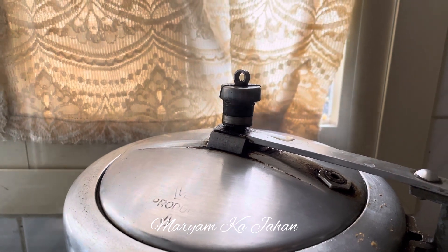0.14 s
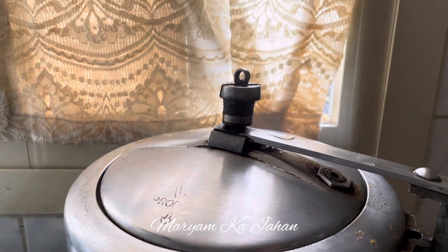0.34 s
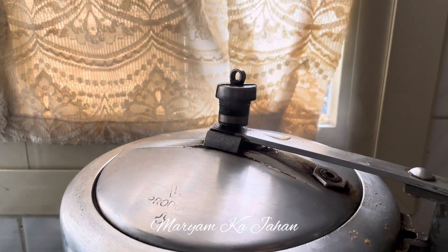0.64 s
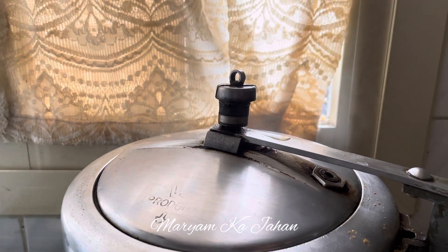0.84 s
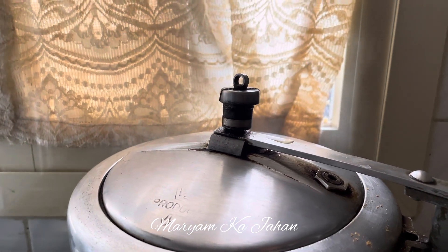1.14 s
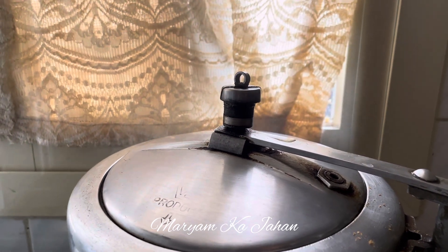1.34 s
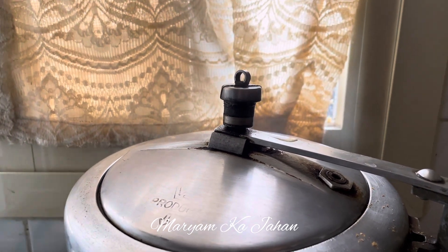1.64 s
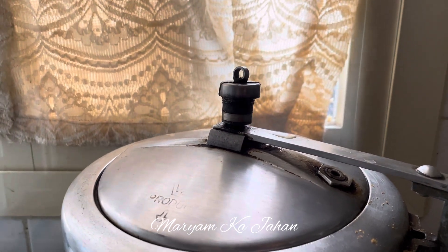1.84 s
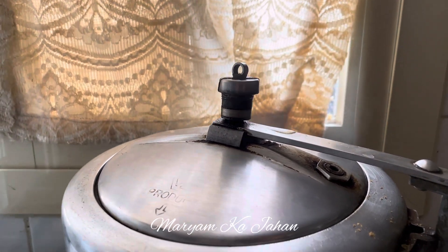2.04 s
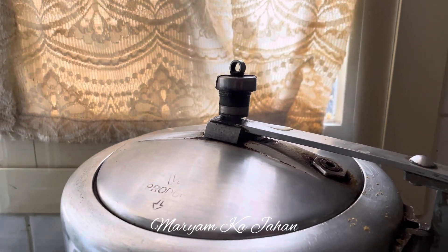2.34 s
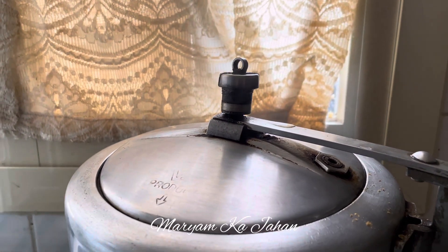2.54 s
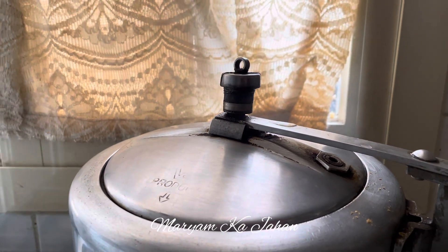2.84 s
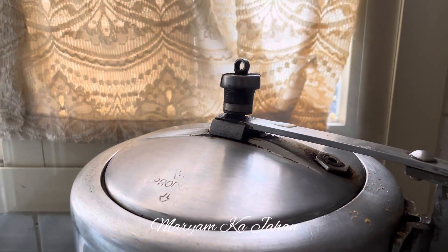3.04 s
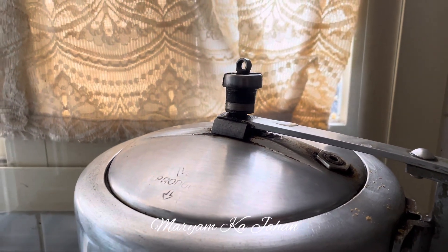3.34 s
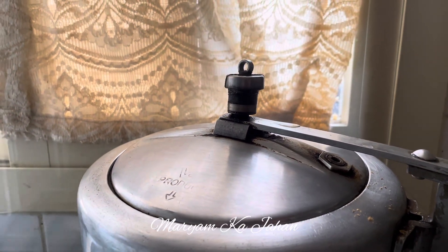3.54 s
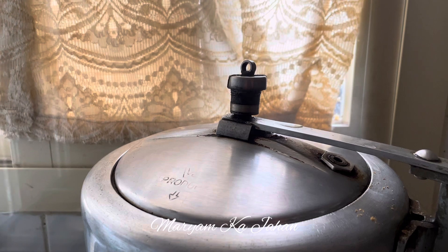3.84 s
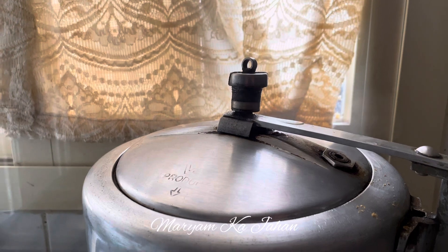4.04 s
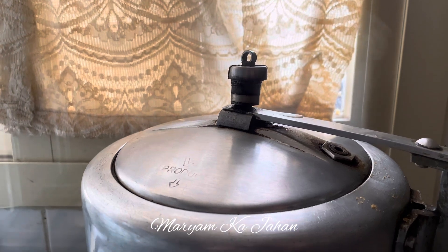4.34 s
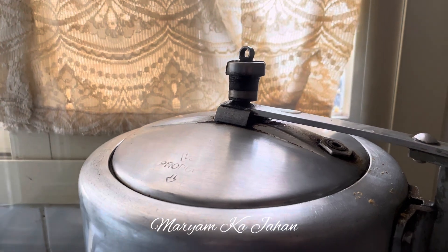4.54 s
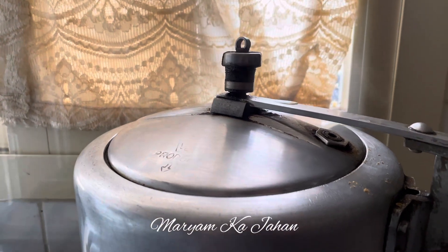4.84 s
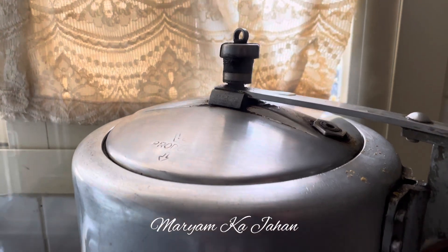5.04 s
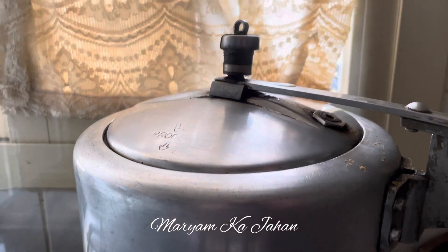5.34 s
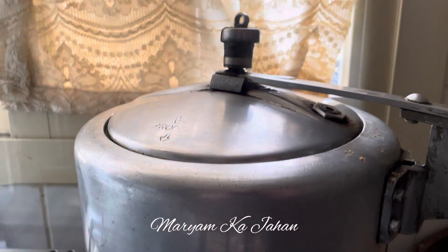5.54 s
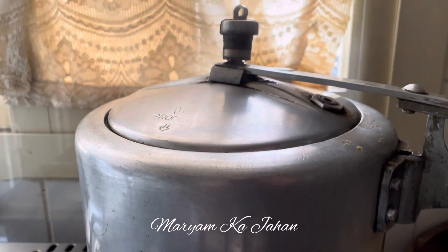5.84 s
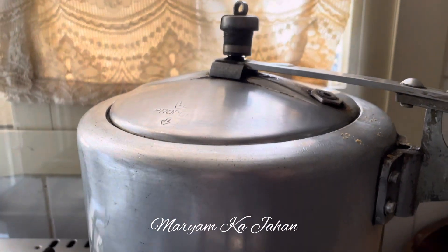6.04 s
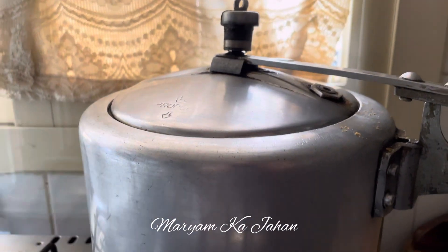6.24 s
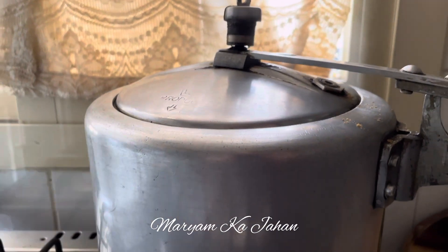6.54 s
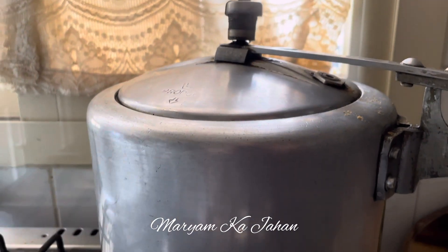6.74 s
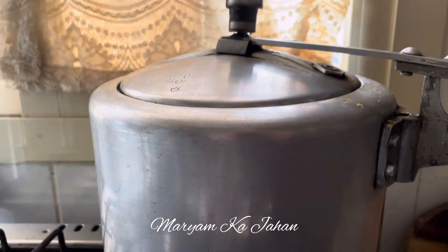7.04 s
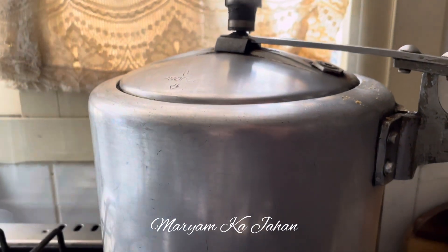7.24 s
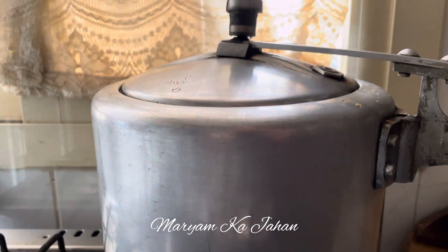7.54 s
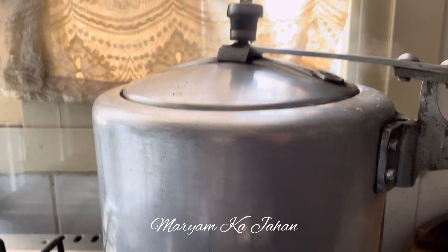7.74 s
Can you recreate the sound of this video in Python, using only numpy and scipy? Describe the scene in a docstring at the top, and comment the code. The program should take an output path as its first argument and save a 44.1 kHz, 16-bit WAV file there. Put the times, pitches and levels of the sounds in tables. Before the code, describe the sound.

A pressure cooker vents steam continuously, a sharp airy hiss fluttering slightly, with low flame roar and mains hum underneath.

```python
"""Steam hisses from under the weighted valve of a pressure cooker, over burner rumble and a faint hum.
Steam is noise coloured by jet, valve and echoes; the burner is low noise through pot and room resonances.
Hum is wavering sines, the faint whistle one unsteady sine, the soft bumps damped modes.
A hand-held pair of ports sinks from above the lid to beside the pot and tilts, shifting colour and echoes."""
import sys
import numpy as np
from scipy import signal
from scipy.fft import rfft, irfft
from scipy.io import wavfile

SR = 44100
rng = np.random.default_rng(int(sys.argv[2]) if len(sys.argv) > 2 else 0)


def generate_wav(signal):
    """Clip the signal to [-1, 1] and save it as 16-bit WAV at the path in sys.argv[1]."""
    frames = np.transpose(np.atleast_2d(signal))
    scaled = np.clip(frames, -1, 1) * 32767
    pcm = np.round(scaled).astype(np.int16)
    wavfile.write(sys.argv[1], SR, pcm)


N = 347949
TIME = np.arange(N) / SR
CUTOFF_HZ = 15720
FRAME = 1024  # samples per STFT frame
CROSSOVER_HZ = 1305  # burner below, jet above


def from_db(db):
    """Decibels to amplitude gain."""
    return 10 ** (np.asarray(db) / 20)


def read(rows, at):
    """Each column of a table, joined by straight lines."""
    first, *columns = np.transpose(rows)
    return [np.interp(at, first, column) for column in columns]


def read_hz(rows, hz):
    """Each column of a spectrum, joined on a log-frequency axis."""
    first, *columns = np.transpose(rows)
    return [np.interp(np.log(hz + 1), np.log(first), column) for column in columns]


def bell(at, centre, width):
    """Gaussian hump of height 1, in frequency or time; width is its sigma."""
    return np.exp(-.5 * ((at - centre) / width) ** 2)


def drift(per_s, at):
    """Normal random values, per_s of them each second, joined by straight lines."""
    steps = rng.standard_normal(4096)
    return np.interp(at * per_s, np.arange(len(steps)), steps)


def ease(t, middle_s, lasts_s):
    """Half-sine move from 0 to 1."""
    return (1 + np.sin(np.pi * np.clip((t - middle_s) / lasts_s, -.5, .5))) / 2


def panned(balance_db):
    """Left and right gains for a left-minus-right level difference."""
    return from_db(np.array([balance_db, -balance_db]) / 2)


def white_pair():
    """Two independent noises of 0 dB per Hz."""
    return rng.standard_normal((2, N)) * np.sqrt(SR / 2)


def jet_share(hz, order=8):
    """Share of the power that belongs to the jet; the burner has the rest."""
    return 1 - 1 / (1 + (hz / CROSSOVER_HZ) ** order)


# pickup of the two ports: pitch_hz, left_lead_rad, likeness_0_to_1, left_minus_right_db
PORT_PAIR = [(50, .1, .74, 0), (320, .2, .83, 0), (520, .3, .55, 0), (1050, .8, .4, 0), (1400, .3, .52, 0),
             (1850, .2, .87, -1), (2280, 1.1, .55, -2), (2470, 2.2, .75, -.5), (2550, np.pi, 1, 0),
             (3260, np.pi, 1, 0), (3400, 4.6, .45, 0), (3780, 6.28, .99, 0), (4100, 6.3, .99, -.7),
             (4500, 6.5, .92, -2), (5250, 7.8, .6, -1.5), (5550, 6.4, .85, 0), (5850, 5.5, .25, 0),
             (6900, 4.5, .65, 2.5), (7400, 4.1, .6, 1.7), (7700, 3.25, .94, 1), (8000, 3.25, .9, .7),
             (8140, 3.2, .95, .4), (8230, np.pi, 1, 0), (9120, np.pi, 1, 0), (9260, 3.08, .97, 0),
             (9520, 3.0, .94, 0), (9900, 2.2, .82, 0), (11500, 1.3, .76, 0), (11950, .3, .72, 0),
             (12750, 0, .998, 0)]


def at_ports(spectra, hz, smear=0):
    """Mixes two independent spectra to each band's phase lead, likeness and balance at the ports."""
    lead_rad, alike, balance_db = read(PORT_PAIR, hz)
    alike = alike * (1 - np.clip(smear, 0, 1))
    shared = np.sqrt((1 + alike) / 2) * spectra[0]
    own = np.sqrt((1 - alike) / 2) * spectra[1]
    left = (shared + own) * np.exp(.5j * lead_rad)
    right = (shared - own) * np.exp(-.5j * lead_rad)
    return panned(balance_db) * np.array([left, right])


# viewpoint: 0 above the lid, 1 beside the pot
SINK_S, SINK_LASTS_S, VIEW_START, VIEW_END = 4.72, 2, 0.22, 1
TURN_S, TURN_LASTS_S, TURN_SHIFT_HZ = 6.39, 2.33, 610
SHAKE_HZ, SHAKES_PER_S = 48, 7
# brief sways of the hand: centre_s, sigma_s, shift_hz
HAND_SWAYS = [(.75, 0.19, -130), (1.998, 0.47, 221), (3.62, 0.28, -1020)]


def hand(t):
    """Viewpoint, and the shift in Hz that sinking hand's turn, sways and shake give the out-of-step band."""
    viewpoint = VIEW_START + (VIEW_END - VIEW_START) * ease(t, SINK_S, SINK_LASTS_S)
    turn_hz = TURN_SHIFT_HZ * ease(t, TURN_S, TURN_LASTS_S)
    sways_hz = sum(shift_hz * bell(t, s, sigma_s) for s, sigma_s, shift_hz in HAND_SWAYS)
    shake_hz = SHAKE_HZ * drift(SHAKES_PER_S, t)
    return viewpoint, turn_hz + sways_hz + shake_hz


# steam strength: time_s, level_db
STEAM_FLOW = [(0.0, -0.8), (0.19, -1.4), (0.26, 0.2), (0.37, 1.0), (0.54, -0.8), (0.63, 0.2), (0.85, -0.8),
              (1.33, 0.2), (1.69, -1.4), (1.87, 0.5), (1.96, -1.2), (2.07, 0.2), (2.32, -0.8), (2.56, -0.6),
              (2.64, 0.4), (2.76, -0.6), (2.92, 0.5), (2.98, -0.4), (3.09, 0.2), (3.17, -1.4), (3.27, 0.1),
              (3.38, -0.8), (3.46, 0.2), (3.58, -0.8), (3.73, -0.4), (4.06, -1.6), (4.24, 0.2),
              (4.82, -0.7), (5.22, 1.0), (5.58, 0.1), (5.64, -0.7), (5.85, 0.4), (6.16, -0.5), (6.23, -1.6),
              (6.33, -0.5), (6.58, -1.0), (7.0, 0.7), (7.11, -0.3), (7.57, -0.2), (7.65, -1.7),
              (7.74, -0.9), (7.88, -2.0)]


def steam_flow_db(t):
    """Strength of the jet, swelling unevenly as the weight rocks on its seat."""
    flow_db, = read(STEAM_FLOW, t)
    return flow_db


# passing resonances: centre_s, sigma_s, pitch_hz, slide_hz_per_s, sigma_hz, peak_db
SINGING_MODES = [(2.7, 0.5, 10370, -30, 70, 0), (2.9, 0.56, 8400, 0, 80, 0), (3.4, 0.36, 11500, 0, 110, 0),
                 (4.452, 0.5, 11510, 20, 60, 8.5), (5.4, 0.55, 7360, -70, 39.7, 1.5),
                 (7.1, 0.6, 5820, 3, 55, 3.5), (7.5, 0.29, 7160, -50, 40, 3.5)]


def singing_db(hz, t):
    """Narrow resonances of the valve gap swell, slide and fade as the weight shifts on its seat."""
    total_db = 0
    for s, sigma_s, pitch_hz, slide_hz_per_s, sigma_hz, peak_db in SINGING_MODES:
        slid_pitch_hz = pitch_hz + slide_hz_per_s * (t - s)
        total_db = total_db + peak_db * bell(t, s, sigma_s) * bell(hz, slid_pitch_hz, sigma_hz)
    return total_db


def turbulence_db(hz, t, surge_db, surges_per_s, eddy_db, eddies_per_s, count=9):
    """The whole jet flutters as the weight trembles; eddies flicker in each band on their own."""
    centres_hz = np.linspace(0, CUTOFF_HZ, count)
    sigma_hz = centres_hz[1] / 2
    eddies = sum(bell(hz, centre_hz, sigma_hz) * drift(eddies_per_s, t) for centre_hz in centres_hz)
    return surge_db * drift(surges_per_s, t) + eddy_db * eddies


def echo_ripple_db(hz, stretch, depth_db, shortest_s, longest_s, count=14):
    """Short echoes off lid and tiles comb the hiss; with tilt some paths grow and others shrink."""
    delays_s = rng.uniform(shortest_s, longest_s, count)
    slants = rng.uniform(-0.837, 1, count)
    rad_per_s = (2 * np.pi * hz).astype(np.float32)
    ripple = 0
    for delay_s, slant in zip(delays_s, slants):
        ripple = ripple + np.cos(rad_per_s * np.float32(delay_s * (1 + slant * stretch)))
    return depth_db * np.sqrt(2 / count) * ripple


# lower hiss: strongest at one tilt, fades to either side
LOWER_HISS_HZ, LOWER_HISS_SIGMA_HZ, LOWER_HISS_DB = 4100, 850, 2
BEST_SHIFT_HZ, LOSS_UP_DB_PER_KHZ, LOSS_DOWN_DB_PER_KHZ = 278, 13, 3
# narrow beam off the lid; the left port gets a share of its dB
BEAM_HZ, BEAM_SIGMA_HZ, BEAM_LEFT_SHARE = 5990, 340, 0.28
OFF_BEAM_ABOVE_DB, OFF_BEAM_BESIDE_DB = 1.5, -8.5
# echo path stretch, as a share of length
ECHO_STRETCH_PER_KHZ, ECHO_WANDER, ECHO_WANDERS_PER_S = 0.0446, 0.0063, 1.578
# out-of-step bands
SLIDE_HZ, SLIDE_SIGMA_HZ = 3640, 700
UPPER_HZ, UPPER_SIGMA_HZ, UPPER_DROP_HZ = 8750, 1800, 255
WAVER_LOWER_HZ, WAVER_UPPER_HZ, WAVERS_PER_S = 71, 140, 24
# likeness is lost around here when tilted far down
SMEAR_HZ, SMEAR_SIGMA_HZ, SMEAR_BELOW_HZ, SMEAR_SPAN_HZ = 2800, 420, 560, 400
# jet spectrum from two viewpoints: pitch_hz, above_db_per_hz, beside_db_per_hz
JET_SPECTRUM = [(1300.0, -83.3, -84.8), (2400.0, -86.2, -86.8), (3500.0, -83.8, -85.3),
                (4200.0, -79.1, -81.3), (5500.0, -79.8, -78.4), (6200.0, -80.0, -78.2),
                (6800.0, -74.5, -73.2), (8200.0, -73.2, -70.7), (9400.0, -73.4, -69.5),
                (10300.0, -75.7, -67.3), (11400.0, -67.8, -72.5), (11900.0, -77.6, -76.8),
                (13000.0, -80.7, -80.4), (14200.0, -80.5, -84.1), (15600.0, -81.3, -82.3)]
# peaks and notches of valve and lid: pitch_hz, sigma_hz, above_db, beside_db
VALVE_AND_LID = [(1640.0, 90.0, -0.5, -2.5), (1820.0, 90.0, 5.4, 4.7), (2090.0, 140.0, 1.0, 6.2),
                 (2920.0, 190.0, 3.4, 2.3), (3350.0, 60.0, -2.8, 0.0), (3720.0, 90.0, 0.0, -2.2),
                 (4450.0, 210.0, 1.8, 1.9), (6230.0, 90.0, -1.5, -1.0), (6700.0, 100.0, 1.7, 1.5),
                 (7340.0, 55.0, 1.0, 3.0), (7560.0, 90.0, -1.5, -1.0), (8190.0, 180.0, 3.8, 2.2),
                 (9100.0, 110.0, 1.8, 0.0), (9550.0, 130.0, -1.2, 0.0), (10330.0, 250.0, 7.6, -0.5),
                 (10780.0, 100.0, -2.3, 0.1), (11150.0, 110.0, 2.0, 2.6), (11520.0, 80.0, 0.8, 1.0),
                 (12580.0, 290.0, 3.8, 1.8), (13230.0, 80.0, -0.5, -5.5), (13560.0, 150.0, 3.4, 1.5)]
# ports cross the beam: centre_s, sigma_s, rise_db
LID_BEAM_CROSSINGS = [(2.03, 0.16, 4.5), (7.166, 0.92, 17)]


def steam():
    """Jet noise, coloured by valve and lid according to where it is heard from."""
    hz, t, noise = signal.stft(white_pair(), SR, nperseg=FRAME)
    hz = hz[:, None]
    viewpoint, shift_hz = hand(t)
    off_khz = (shift_hz - BEST_SHIFT_HZ) / 1000

    above_db, beside_db = read_hz(JET_SPECTRUM, hz)
    for pitch_hz, sigma_hz, mode_above_db, mode_beside_db in VALVE_AND_LID:
        shape = bell(hz, pitch_hz, sigma_hz)
        above_db = above_db + mode_above_db * shape
        beside_db = beside_db + mode_beside_db * shape
    level_db = steam_flow_db(t) + above_db * (1 - viewpoint) + beside_db * viewpoint

    tilt_loss_db = np.maximum(LOSS_UP_DB_PER_KHZ * off_khz, -LOSS_DOWN_DB_PER_KHZ * off_khz)
    lower_shape = bell(hz, LOWER_HISS_HZ, LOWER_HISS_SIGMA_HZ)
    level_db = level_db + (LOWER_HISS_DB - tilt_loss_db) * lower_shape
    level_db = level_db + singing_db(hz, t)
    level_db = level_db + turbulence_db(hz, t, surge_db=.25, surges_per_s=40, eddy_db=.55, eddies_per_s=110)
    stretch = ECHO_STRETCH_PER_KHZ * off_khz + ECHO_WANDER * drift(ECHO_WANDERS_PER_S, t)
    level_db = level_db + echo_ripple_db(hz, stretch, depth_db=3.0, shortest_s=.004, longest_s=.0125)

    beam_db = OFF_BEAM_ABOVE_DB * (1 - viewpoint) + OFF_BEAM_BESIDE_DB * viewpoint
    beam_db = beam_db + sum(rise_db * bell(t, s, sigma_s) for s, sigma_s, rise_db in LID_BEAM_CROSSINGS)
    beam_db = beam_db * bell(hz, BEAM_HZ, BEAM_SIGMA_HZ)
    gain = from_db([level_db + BEAM_LEFT_SHARE * beam_db, level_db + beam_db]) * np.sqrt(jet_share(hz))

    # reading PORT_PAIR at displaced frequencies moves the out-of-step bands
    upper_shape = bell(hz, UPPER_HZ, UPPER_SIGMA_HZ)
    slid_hz = hz - shift_hz * bell(hz, SLIDE_HZ, SLIDE_SIGMA_HZ)
    slid_hz = slid_hz + UPPER_DROP_HZ * (viewpoint - .5) * upper_shape
    slid_hz = slid_hz + WAVER_LOWER_HZ * drift(WAVERS_PER_S, t) * bell(hz, SMEAR_HZ, SLIDE_SIGMA_HZ)
    slid_hz = slid_hz + WAVER_UPPER_HZ * drift(WAVERS_PER_S, t) * upper_shape
    smear = np.clip((-shift_hz - SMEAR_BELOW_HZ) / SMEAR_SPAN_HZ, 0, 1)
    heard = at_ports(noise, slid_hz, smear * bell(hz, SMEAR_HZ, SMEAR_SIGMA_HZ))
    return signal.istft(gain * heard, SR, nperseg=FRAME)[1][:, :N]


BASS_FOLLOWS, BASS_SIGMA_HZ = 0.66, 95  # share of the dB swing followed; reach above 0 Hz
# burner and simmering pot: pitch_hz, level_db_per_hz, left_minus_right_db
BURNER_SPECTRUM = [(20, -99, 22), (34, -82.5, 9), (51.6, -68.5, 0.5), (110, -69.5, 2.5), (158, -71.5, 1.5),
                   (244, -77, 5.5), (270, -74.5, 5), (433, -76.5, -1.5), (467, -82.5, 11), (502, -75.5, 3),
                   (750, -81.5, 4.5), (904, -77, 2.5), (1080, -81.5, 3.5), (1550, -83, 0.5),
                   (2440, -113, -23)]
# resonances of pot and room: pitch_hz, sigma_hz, peak_db
POT_AND_ROOM = [(73.9, 1.7, 5), (112.8, 1.8, 8), (127, 4.9, 2.5), (223, 5.3, 3), (295, 6.7, 4),
                (342, 4, 5.5), (398, 4, 7.5), (527, 12, 1)]
# bass of the roar, only the swing about the mean is used: time_s, level_db
BASS_SWING = [(0.0, -48), (0.04, -48), (0.53, -49.5), (1.8, -48), (2.9, -50), (4.99, -47), (5.65, -44),
              (5.76, -56), (5.87, -46), (5.94, -49), (5.99, -44.5), (6.11, -58), (6.18, -48), (6.55, -47),
              (7.2, -47.5), (7.26, -38.5), (7.4, -55), (7.55, -39), (7.7, -42), (7.75, -40), (7.89, -52)]


def burner(flicker_db, flickers_per_s, surge_db, surges_per_s):
    """Low roar of flame and simmering water, booming in pot and room; it flickers and its bass surges."""
    hz = np.arange(N // 2 + 1) * SR / N
    level_db, balance_db = read_hz(BURNER_SPECTRUM, hz)
    level_db = level_db + sum(peak_db * bell(hz, pitch_hz, sigma_hz)
                              for pitch_hz, sigma_hz, peak_db in POT_AND_ROOM)
    gain = from_db(level_db) * panned(balance_db) * np.sqrt(1 - jet_share(hz))
    spectrum = gain * at_ports(rfft(white_pair()), hz)
    roar = irfft(spectrum, N)
    bass = irfft(spectrum * bell(hz, 0, BASS_SIGMA_HZ), N)
    bass_db, = read(BASS_SWING, TIME)
    swing_db = BASS_FOLLOWS * (bass_db - bass_db.mean())
    swell = from_db(swing_db + surge_db * drift(surges_per_s, TIME))
    flicker = from_db(flicker_db * drift(flickers_per_s, TIME))
    return (roar + (swell - 1) * bass) * flicker


# motors and mains in the kitchen: pitch_hz, level_db_rms, left_minus_right_db
KITCHEN_HUM = [(50.3, -60.5, 2), (99.8, -55.5, 0.5), (200.5, -65, 0), (296.3, -68.5, -2), (391.6, -71, 1),
               (448, -76, 5), (494.6, -78.5, 10), (513.4, -66, -5), (542.4, -68.5, 3), (738, -72, 6),
               (798, -68.5, 17)]


def hum(waver_db, wander_rad):
    """Steady tones that waver slightly in strength and phase."""
    out = np.zeros((2, N))
    for pitch_hz, level_db, balance_db in KITCHEN_HUM:
        phase = 2 * np.pi * (pitch_hz * TIME + rng.random()) + wander_rad * drift(3.03, TIME)
        strength = from_db(level_db + waver_db * drift(2.4, TIME))
        out += panned(balance_db)[:, None] * np.sqrt(2) * np.sin(phase) * strength
    return out


WHISTLE_PEAK_S, WHISTLE_HZ, WHISTLE_DB_RMS = 1.05, 1410, -59
WHISTLE_ATTACK_S, WHISTLE_RELEASE_S = .16, .32


def whistle(balance_db, waver_hz):
    """A thin, unsteady tone that swells and dies away, nearly lost in the hiss."""
    phase = 2 * np.pi * np.cumsum(WHISTLE_HZ + waver_hz * drift(60.5, TIME)) / SR
    envelope = np.interp(TIME - WHISTLE_PEAK_S, [-WHISTLE_ATTACK_S, 0, WHISTLE_RELEASE_S], [0, 1, 0])
    tone = np.sqrt(2) * np.sin(phase) * from_db(WHISTLE_DB_RMS) * envelope
    return panned(balance_db)[:, None] * tone


# soft bumps, before mode levels and filters: start_s, level_db
BUMPS = [(3.744, -43), (3.753, -41), (5.965, -52)]
# damped modes of the housing: pitch_hz, relative_db, t60_s
HOUSING_MODES = [(117, 2, 0.046), (308, 10, 0.027), (444, 3, .03)]


def knocks(lowest_hz, softness_hz):
    """Each soft touch rings the housing's damped modes; treble is softened, the deepest bass is cut."""
    out = np.zeros(N)
    for start_s, bump_db in BUMPS:
        age_s = np.clip(TIME - start_s, 0, .5)
        for pitch_hz, relative_db, t60_s in HOUSING_MODES:
            decay = np.exp(-np.log(1000) * age_s / t60_s)
            out += from_db(bump_db + relative_db) * np.sin(2 * np.pi * pitch_hz * age_s) * decay
    out = signal.sosfilt(signal.butter(2, softness_hz, fs=SR, output="sos"), out)
    return signal.sosfilt(signal.butter(4, lowest_hz, "high", fs=SR, output="sos"), out)


def scene():
    """The cooker on its burner, with the kitchen behind it."""
    cooker = steam() + burner(flicker_db=0.5, flickers_per_s=16, surge_db=1.0, surges_per_s=8)
    kitchen = hum(waver_db=0.5, wander_rad=0.48)
    return cooker + kitchen + whistle(balance_db=5, waver_hz=11.0) + knocks(lowest_hz=75, softness_hz=520)


def record(dry):
    """Cuts the top steeply with an elliptic low-pass."""
    return signal.sosfilt(signal.ellip(12, .1, 80, CUTOFF_HZ, fs=SR, output="sos"), dry)


dry = scene()
out = record(dry)
generate_wav(out)
```